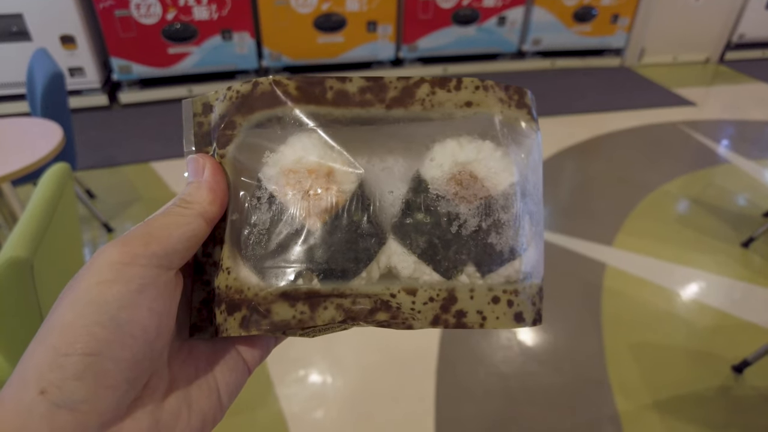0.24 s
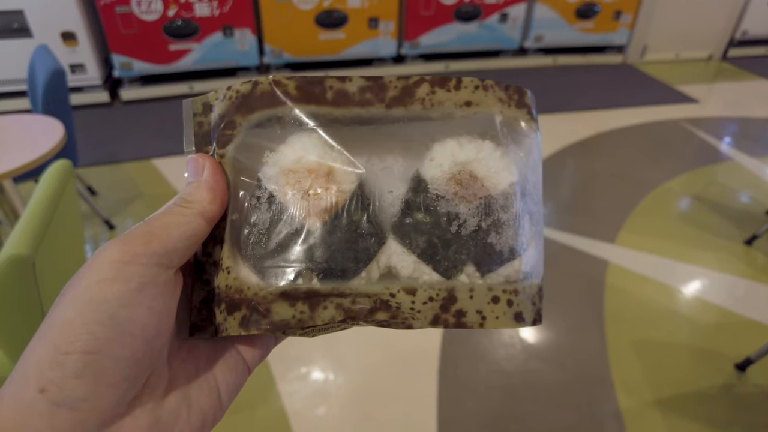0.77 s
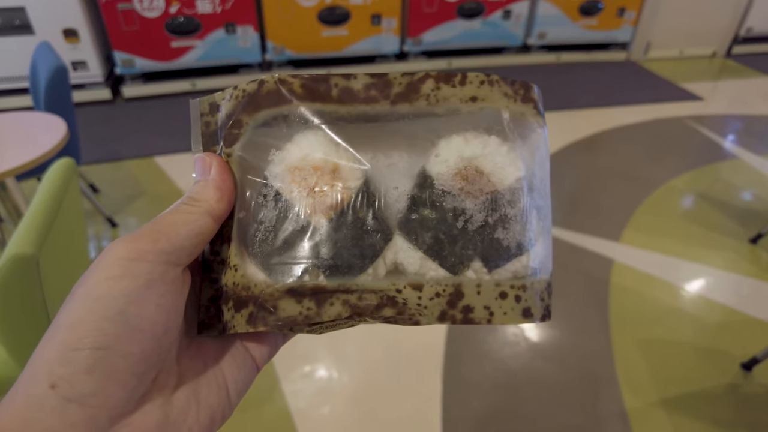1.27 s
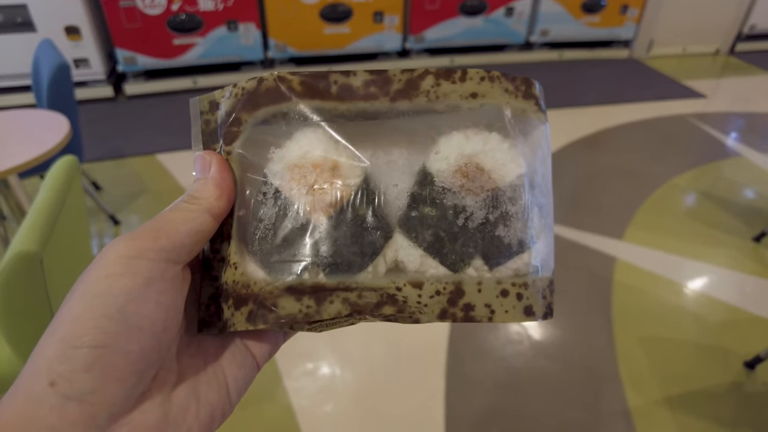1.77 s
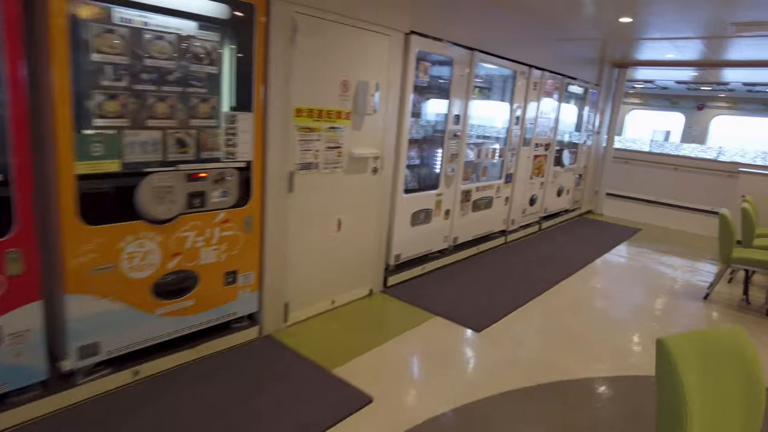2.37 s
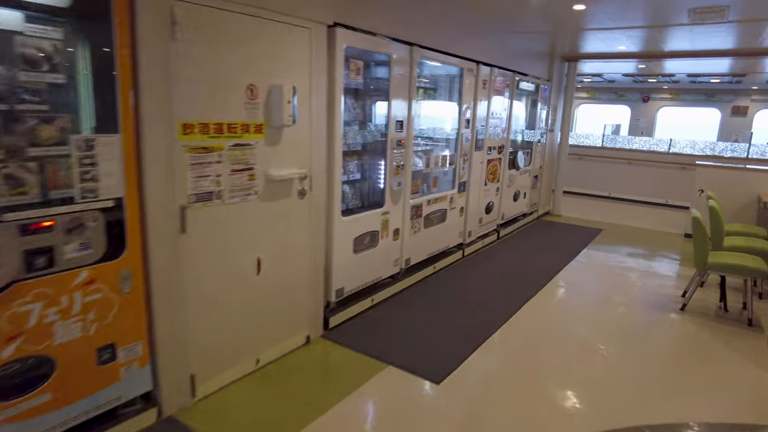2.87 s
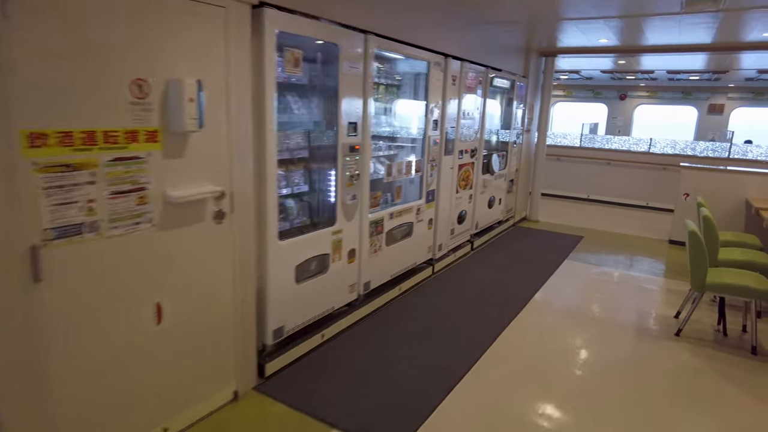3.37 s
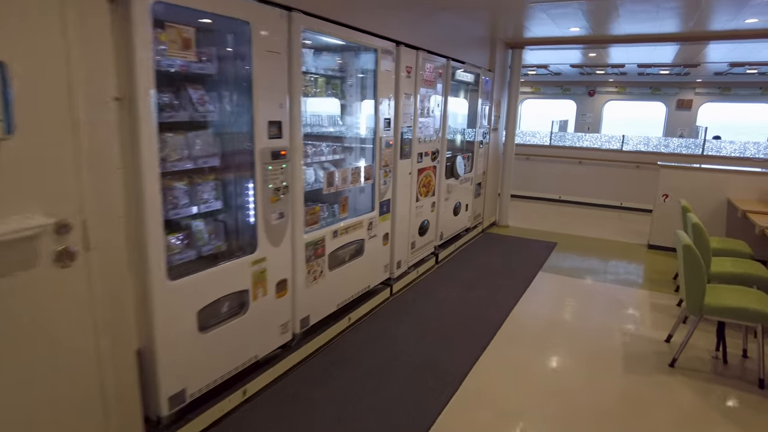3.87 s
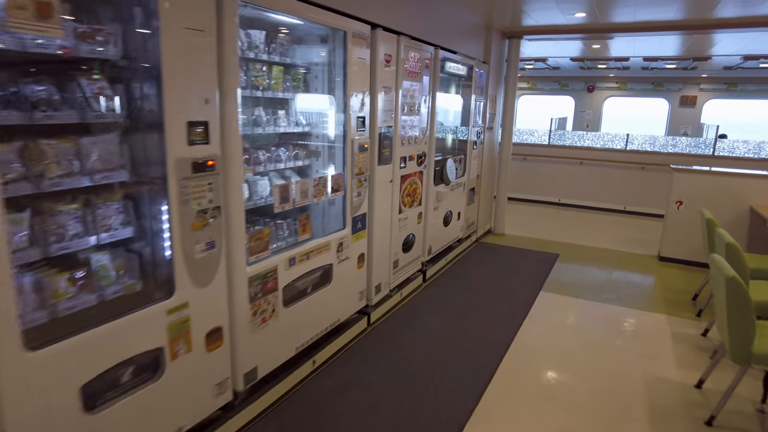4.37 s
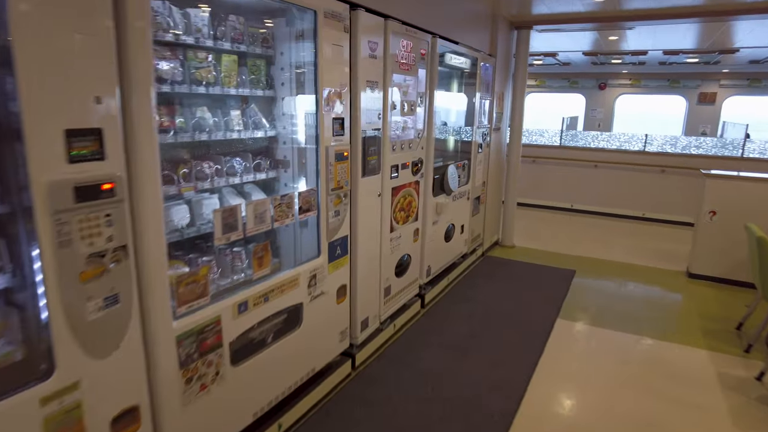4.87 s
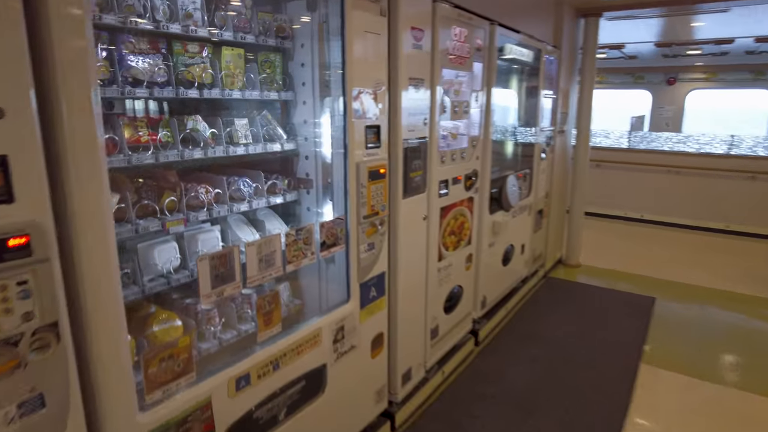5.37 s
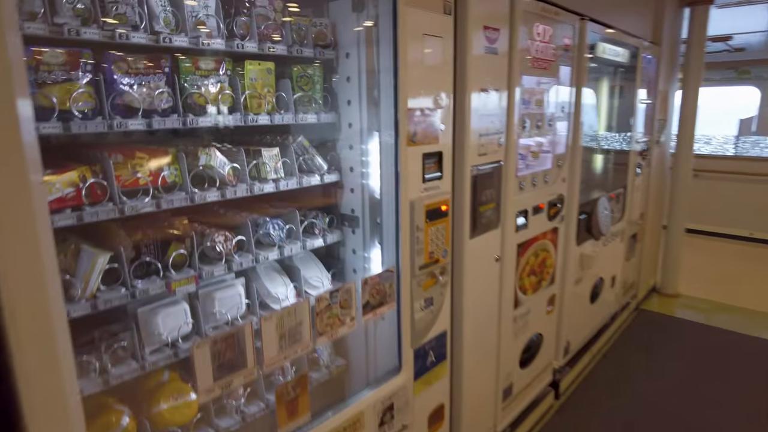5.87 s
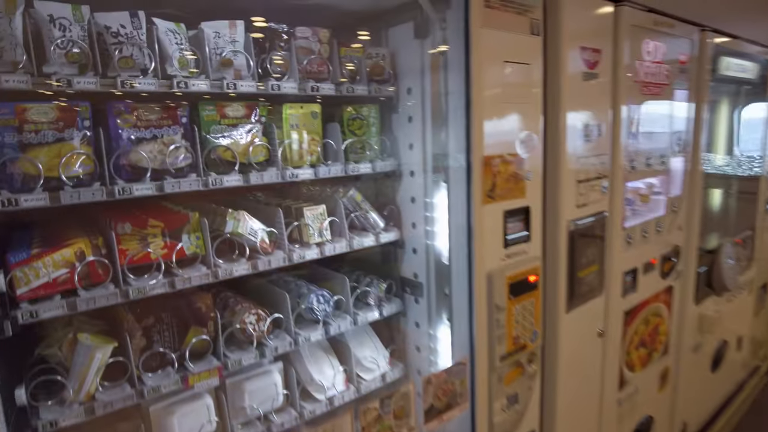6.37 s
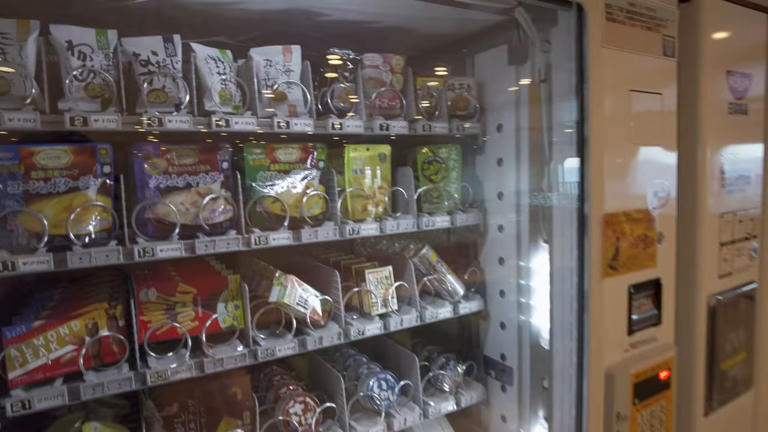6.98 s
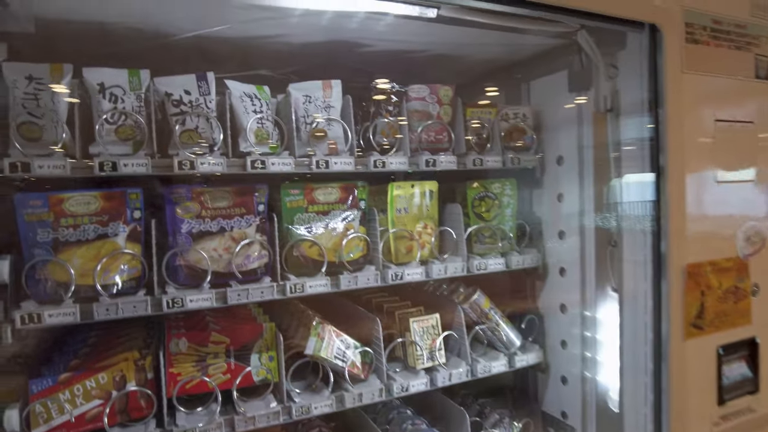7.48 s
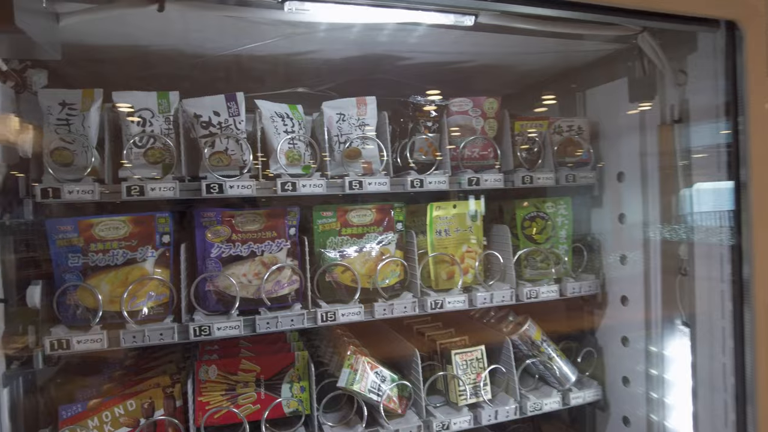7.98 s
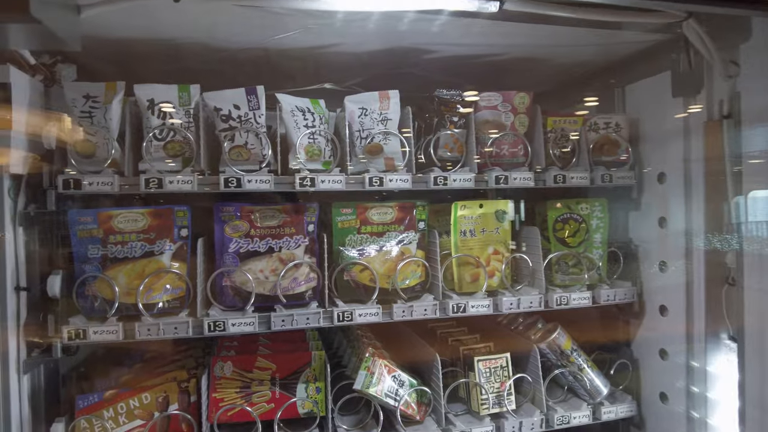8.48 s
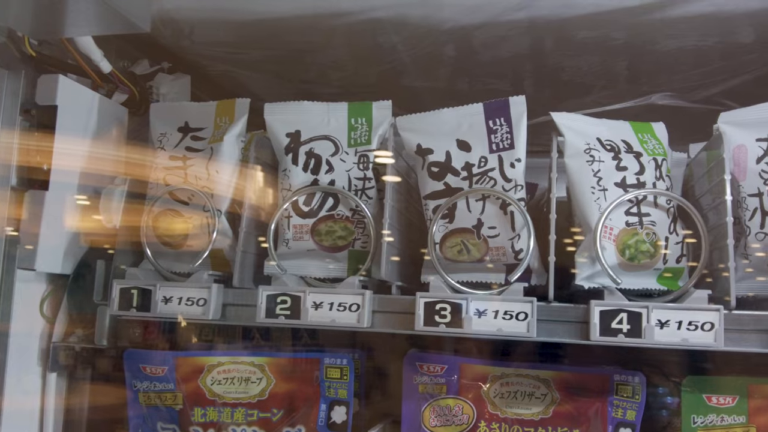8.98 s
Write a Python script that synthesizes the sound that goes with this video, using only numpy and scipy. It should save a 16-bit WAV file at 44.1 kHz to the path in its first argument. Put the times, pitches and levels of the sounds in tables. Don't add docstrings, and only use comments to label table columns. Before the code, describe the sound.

Handheld stereo capture in a ship's snack lounge: heavy low hull shudder, overloaded and pumping, over duct rumble, vent roar, hiss and faint compressor hum. First come crisp packet ticks and stronger rattling buzzes at a table. A hard change starts the walk, with dull deck thuds, small machine tones and a tiny shoe squeak while the throb changes colour. A final jump lands beside a machine, still throbbing.

```python
import sys
import numpy as np
from scipy import signal
from scipy.fft import rfft, irfft, next_fast_len
from scipy.io import wavfile
from scipy.ndimage import uniform_filter1d, minimum_filter1d

SR = 44100
rng = np.random.default_rng(int(sys.argv[2]) if len(sys.argv) > 2 else 0)


def undo_db(level):
    steps = np.asarray(level, float) / 20
    return 10 ** steps


def store_pcm(level_fs):
    pcm = np.round(np.clip(level_fs, -1, 1) * 32767).astype(np.int16)
    wavfile.write(sys.argv[1], SR, np.atleast_2d(pcm).T)


N = 407484
TOP_HZ = 15800

# start in seconds, hull pressure left at its end, pressure at its start.
SHOTS = [
    (0, -.09, .43),
    (2.39465, -.655, -.04),
    (8.76767, -.3, .3),
]
# level in dB, left then right.
HULL_LEAN_DB = [
    [-1.9],
    [1.5],
]
# multiple of the shaft speed, level in dB at the table, in dB where the
# walk starts, in dB where it ends, in dB at the glass.
STRONG = [(6, -15, -20, -12.5, -12), (9, -14, -22, -8.5, -8), (12, -13.5, -17.5, -24, -26),
          (15, -21.5, -16.5, -23, -32)]
# time in seconds, share of the way 0-1.
WALKED = [(2.4, 0.2), (3.4, 0.28), (4.4, 0.51), (5.9, 0.97), (8.76, 0.99)]


def hull():
    # multiple of the shaft speed, level in dB at the table, in dB early in
    # the walk, in dB late in it.
    weak_orders = [(3, -39, -45, -36), (4, -35, -34, -35), (5, -29, -27, -28), (7, -25, -23, -30),
                   (8, -22, -26, -29), (10, -23, -27, -25), (11, -22, -30, -31), (13, -21, -22, -36),
                   (14, -36, -25, -32), (16, -23, -23, -22), (17, -26, -21, -26), (18, -27, -30, -29),
                   (19, -33, -34, -43), (20, -27, -25, -36), (21, -34, -30, -33), (22, -37, -28, -41),
                   (23, -33, -41, -35), (24, -28, -43, -35), (25, -36, -37, -43), (26, -33, -42, -37)]
    still_s = [.91, 2.02, 2.81, 4.47, 4.88, 5.75, 6.18, 7.18, 8.68, 8.93]
    shaft_hz = 1.997
    starts = shot_starts()
    seated = np.arange(N) < starts[1]
    glass_db = -3.5 * (np.arange(N) >= starts[2])
    walked = in_time(WALKED)[0]
    duck_db = -0.95 * lulls()

    orders = [round(row[0]) for row in STRONG + weak_orders]
    levels = [undo_db(db + 3.0 + duck_db) for db in strong_orders()]
    for k, table_db, early_db, late_db in weak_orders:
        walk_db = early_db + (late_db - early_db) * walked
        place_db = np.where(seated, table_db, walk_db) + glass_db
        levels.append(undo_db(place_db + 5.5 + duck_db + 2.0 * drift(0.77)))

    out = np.zeros(N)
    turn = 2 * np.pi * shaft_hz / SR
    for (s, end, begin), a, b in zip(SHOTS, starts, starts[1:]):
        trials = rng.uniform(0, 2 * np.pi, (len(orders), 12000))
        spin = np.exp(1j * trials)

        def pressure(i):
            now = np.array([g[i] * np.exp(1j * k * turn * i) for k, g in zip(orders, levels)])
            return (now @ spin).imag

        still = [abs(pressure(round((q + d) * SR)))
                 for q in still_s for d in (-.02, -.007, .007, .02) if a < q * SR < b]
        peak = np.max([abs(pressure(i)) for i in np.linspace(a, b - 1, 150).astype(int)], axis=0)
        misfit = abs(pressure(b - 1) - end) + abs(pressure(a) - begin)
        misfit += .2 * pressure(a + 300) - .3 * pressure(b - 300) * (end < -.5)
        misfit += np.mean(still, axis=0) + 2 * peak
        angles = trials[:, np.argmin(misfit)]
        i = np.arange(a, b)
        out[i] = sum(g[i] * np.sin(k * turn * i + p) for k, g, p in zip(orders, levels, angles))
    return out * undo_db(HULL_LEAN_DB)


def strong_orders():
    # multiple of the shaft speed, time in seconds,
    # gain in dB, half width in seconds.
    loud_spots = [
        (12, 5.0, 7, 1.2),
        (15, 3.9, 4, .6),
        (15, 8.1, 7, .6),
    ]
    t = (np.arange(N) + .5) / SR
    walked = in_time(WALKED)[0]
    out = []
    for k, table_db, start_db, end_db, glass_db in STRONG:
        walk_db = start_db + (end_db - start_db) * walked
        for multiple, s, db, width in loud_spots:
            if round(multiple) == round(k):
                walk_db = walk_db + db * np.exp(-((t - s) / width) ** 2)
        later_db = np.where(t < SHOTS[2][0], walk_db, glass_db)
        out.append(np.where(t < SHOTS[1][0], table_db, later_db))
    return out


def lulls():
    # time in seconds, gain in dB, length in seconds.
    main_lulls = [(0.153, 3, 0.57), (0.48, 2, 0.19), (0.616, 4, 0.2), (0.77, 4, 0.12), (1.13, 4, 0.35),
                  (1.385, 1, 0.13), (1.638, 4, 0.24), (1.94, 2.5, 0.075), (2.124, 3, 0.2),
                  (2.274, 2.5, 0.21), (2.71, 3, 0.35), (3.01, 1.5, 0.25), (3.388, 1.5, 0.59),
                  (3.712, 2.5, 0.36), (3.974, 2.5, 0.065), (4.27, 0.5, 0.24), (4.44, 3, 0.26),
                  (4.87, 2.5, 0.15), (4.99, 2, 0.17), (5.362, 2.5, 0.14), (5.543, 3, 0.23),
                  (5.703, 2, 0.12), (5.873, 2, 0.23), (6.23, 2, 0.16), (6.475, 1.5, 0.11),
                  (6.678, 3.5, 0.26), (6.858, 4.5, 0.13), (7.26, 1.5, 0.34), (7.478, 2, 0.29),
                  (7.69, 2.5, 0.25), (8.033, 2, 0.12), (8.19, 5, 0.13), (1.015, -1, 0.095),
                  (.85, -1.5, .06), (4.534, -2, 0.057), (4.314, 1.5, 0.05), (4.034, -2, 0.052),
                  (8.316, -0.5, .16)]
    # time in seconds, gain in dB, length in seconds.
    last_lulls = [(8.55, 1.2, 0.23), (8.69, 4.1, 0.068), (8.95, 3.55, 0.21), (9.12, 1.9, 0.27)]
    rise, lead = 0.49, 0.39
    t = np.arange(N) / SR
    return sum(np.interp(t - s + lead * length, [0, rise * length, length], [0, db, 0])
               for s, db, length in main_lulls + last_lulls)


def limiter_db(x):
    ceiling = .79
    need_db = np.minimum(0, 20 * np.log10(ceiling / (abs(x).max(axis=0) + 1e-9)))
    ramp = 110 * np.arange(N) / SR
    held_db = np.minimum.accumulate(minimum_filter1d(need_db, size=441) - ramp) + ramp
    return uniform_filter1d(np.minimum(held_db, 0), size=441)


def butted(x):
    out, starts, lean = x.copy(), shot_starts(), undo_db(HULL_LEAN_DB)
    for (s, end, begin), a, b in zip(SHOTS, starts, starts[1:]):
        i = np.arange(a, b)
        out[:, i] += (begin * lean - x[:, [a]]) * np.exp((a - i) / 700)
        out[:, i] += (end * lean - x[:, [b - 1]]) * np.exp((i - b) / 700)
    return out


def buzzes():
    # start in seconds, peak level in dB, time to fall 60 dB in seconds,
    # left over right in dB.
    rattles = [(0.0982, -48.5, 0.75, 2), (0.632, -37.5, 0.3, 2.5), (1.124, -37, 0.37, 1.5),
               (1.627, -37, 0.29, 3), (2.1266, -41, 0.2, 2), (2.8094, -52, 0.88, 1.5),
               (3.7494, -53, 0.44, 8), (3.8693, -52, 0.7, -1), (4.2094, -51.5, 0.32, 1),
               (4.2971, -47.5, 0.54, 2), (4.4394, -51.5, 0.7, 2), (4.9932, -47, 0.24, 2),
               (5.4694, -57, 0.31, 10.5), (5.7069, -49, 0.099, -9), (6.1669, -49, 0.7, 1.5),
               (6.6793, -50.5, 0.37, -1), (6.8563, -41, 0.25, 0.5), (7.1656, -53, 0.36, -7),
               (7.2734, -45.5, 0.4, 2), (7.519, -43.5, 0.31, 2), (8.0278, -47, 0.5, -1.5),
               (8.1994, -55, 0.09, -5.5), (8.5205, -47.5, 0.33, 3.5), (8.9294, -48, 0.27, -2)]
    # frequency in Hz, level in dB per Hz.
    edge_colour = [(6000, -28), (7500, -5.5), (9200, -3), (10000, -5.5), (12300, -9), (14100, -8),
                   (15800, -7)]
    # frequency in Hz, level in dB per Hz.
    body_colour = [(600, -37), (1500, -11), (3500, -0.5), (6000, -7.5), (8000, -15), (10000, -32.5)]
    t, edge, body = np.arange(N) / SR, np.zeros((2, N)), np.zeros((2, N))
    for s, peak_db, t60, pan_db in rattles:
        at = slice(round(s * SR), round((s + 0.72) * SR))
        age = t[at] - t[at][0]
        fall_db = -60 * age / np.clip(t60, .1, .7)
        fall = undo_db(peak_db - 10.5 + fall_db + pan_db * np.array([[.5], [-.5]]))
        edge[:, at] += fall * (1 - np.exp(-age / 0.003))
        body[:, at] += fall * undo_db(8) * (1 - np.exp(-age / 0.01))
    flutter = undo_db(1.6 * drift(60))
    return (edge * broad(edge_colour) + body * broad(body_colour)) * flutter


def ticks():
    # start in seconds, level in dB, low edge in Hz, high edge in Hz,
    # decay in seconds.
    snaps = [
        (.1862, -30, 3000, 5600, .0012),
        (.1863, -29, 6000, 9200, .001),
        (.1865, -39, 9500, 15500, .001),
        (.187, -29, 1500, 2400, .002),
        (.1872, -35, 700, 1400, .002),
        (.1947, -32, 3000, 8500, .0009),
        (.1949, -45, 9500, 15500, .0012),
        (.4894, -49, 7500, 13000, .003),
        (.7698, -35, 6000, 8100, .0018),
        (.7705, -36, 2000, 3200, .0012),
    ]
    out, age = np.zeros(N), np.arange(400) / SR
    for s, db, low_hz, high_hz, decay in snaps:
        crackle = rng.standard_normal(400)
        band = signal.butter(3, [low_hz, high_hz], "band", fs=SR, output="sos")
        snap = signal.sosfilt(band, crackle * np.exp(-age / decay) * (1 - np.exp(-age / 0.00023)))
        start = round(s * SR)
        out[start:start + 400] += snap / abs(snap).max() * undo_db(db)
    return out


def footfalls():
    # start in seconds, level in dB, pitch in Hz,
    # time to fall 60 dB in seconds.
    steps = [(2.04, -22, 64, 0.46), (2.62, -16, 59, 0.44), (6.04, -20, 55, .4), (6.79, -24, 100, 0.34),
             (7.4, -26, 55, 0.33), (8.2, -32.5, 95, .25), (9.04, -28, 59.5, .25)]
    out, age = np.zeros(N + SR), np.arange(SR // 2) / SR
    for s, db, hz, t60 in steps:
        swell = undo_db(db - 60 * age / t60) * (1 - np.exp(-age / .015))
        start = round(s * SR)
        out[start:start + SR // 2] += swell * np.sin(2 * np.pi * hz * age * (1 - 0.59 * age))
    return out[:N]


def squeaks():
    # start in seconds, end in seconds, pitch in Hz, width in Hz, level in dB.
    machine_tones = [(0, 2.39, 5410, 45, -72), (2.95, 3.55, 7800, 150, -81), (2.962, 2.99, 2560, 120, -54),
                     (2.988, 3.012, 2580, 120, -51.5), (6.172, 6.206, 4450, 400, -54),
                     (2.4, 4.0, 177, 3, -45), (2.56, 2.68, 572, 12, -52), (2.36, 2.41, 585, 40, -51),
                     (2.21, 2.31, 910, 40, -53), (8.35, 8.62, 228, 4, -45), (5.85, 6.8, 243, 3, -46.5),
                     (5.2, 8.76, 227, 4, -51), (0, 2.39, 238, 14, -49), (7.35, 7.85, 238, 3, -47),
                     (5.2, 5.5, 234, 4, -47), (2.55, 2.95, 236, 6, -48), (6.85, 6.876, 1330, 90, -47),
                     (6.868, 6.892, 1560, 90, -48), (4.148, 4.172, 3440, 90, -58),
                     (4.128, 4.148, 2980, 120, -56), (4.05, 4.08, 2980, 120, -58),
                     (2.99, 3.02, 3020, 90, -57)]
    # start in seconds, length in seconds, first pitch in Hz, last pitch in Hz, level in dB.
    sole_squeak = (4.293, .037, 10800, 10150, -62)
    t = np.arange(N) / SR

    def gate(start, end):
        return np.clip(np.minimum(t - start, end - t) / .008, 0, 1)

    out = np.zeros(N)
    for start, end, hz, width, db in machine_tones:
        out += gate(start, end) * undo_db(db) * whistle(hz, width)
    s, length, from_hz, to_hz, db = sole_squeak
    hz = from_hz + (to_hz - from_hz) * np.clip((t - s) / length, 0, 1) ** 2
    return out + undo_db(db) * gate(s, s + length) * np.sin(2 * np.pi * np.cumsum(hz) / SR)


def whistle(hz, width):
    r = np.exp(-np.pi * width / SR)
    ring = [1, 0, -1, 1, -2 * r * np.cos(2 * np.pi * hz / SR), r * r]
    return rms_one(signal.sosfilt([ring, ring], rng.standard_normal(N)))


def room():
    # frequency in Hz, level in dB per Hz.
    rumble_colour = [(26, -27), (45, 1), (49, -9), (65, -8.5), (140, -24), (167, -24), (201, -25.5),
                     (233, -24.5), (326, -30.5), (571, -36), (1100, -43.5), (1430, -74), (2420, -120)]
    # frequency in Hz, level in dB per Hz.
    vent_colour = [(530, -29.5), (900, -8), (1040, -14), (1160, -6), (1270, 1), (2070, -4.5), (2350, -8.5),
                   (3050, -7.5), (3520, -15), (4360, -17), (5000, -26.5), (6500, -44.5), (11000, -120)]
    # frequency in Hz, level in dB per Hz.
    hiss_colour = [(2350, -31), (4000, -3.5), (5690, -4.5), (8620, -15.5), (11700, -18), (12800, -18),
                   (15900, -27.5)]
    # pitch in Hz, width in Hz, level in dB.
    hum_tones = [(59.8, 2.3, -32), (83, 15, -39.5), (114.4, 2.3, -45.5), (148.6, 22, -46),
                 (177.6, 7.4, -53), (262.6, 6.7, -60.5), (291.6, 5.3, -56.5), (357.4, 4.8, -58),
                 (386.3, 6.7, -63.5), (568, 19, -60.5), (676, 9.4, -65.5), (787, 32, -64.5),
                 (922, 30, -67.5), (1230, 48, -63.5)]
    # pitch in Hz, width in Hz, level in dB.
    whine_tones = [(7760, 400, -82.5), (10800, 550, -85), (12900, 670, -80), (14800, 1200, -86)]
    # start in seconds, then rumble, hiss and whine in dB over their usual level.
    places = [
        (0, 1.3, 3.5, -6),
        (2.39, 0.54, 2.5, 3.5),
        (4.02, -0.25, 1.45, 2),
        (8.77, 0.5, 2.4, 0),
    ]
    rumble_db, hiss_db, whine_db = by_place(places)
    age = np.arange(N) / SR - 2.2
    whine_db = whine_db + 7 * (age > 0) * np.clip(1 - (age / 1.8) ** 2, 0, 1)
    air_db = pumping()
    pump_db = air_db + 53
    rumble = undo_db(-30 + rumble_db + 0.79 * pump_db) * broad(rumble_colour)
    vent = undo_db(air_db + 3.0) * broad(vent_colour)
    hiss = undo_db(-63.5 + hiss_db + .85 * pump_db + 1.5 * drift(9.9)) * broad(hiss_colour)
    whines = undo_db(whine_db - 1.5 + pump_db + 1.5 * drift(20)) * tones(whine_tones)
    hums = undo_db(0.22 * pump_db) * tones(hum_tones)
    return rumble + vent + hiss + whines + hums


def pumping():
    # time in seconds, level in dB.
    held_air = [(0, -54.5), (0.1, -51), (2.3, -49), (2.5, -50.5), (3.6, -49.5), (4.4, -50.5), (4.7, -51),
                (6.0, -50.5), (7.3, -50), (7.9, -52), (8.3, -54.5), (8.8, -50.5), (9.15, -51.5),
                (9.24, -58.5)]
    return in_time(held_air)[0] + 1.33 * lulls()


def broad(spectrum):
    low_hz, high_hz = spectrum[0][0], spectrum[-1][0]
    return coloured(lambda hz: undo_db(at_hz(spectrum, hz)) * (hz > low_hz) * (hz < high_hz))


def tones(table):
    def peaks(hz):
        return sum(undo_db(db) / np.sqrt(w) / (1 + (2 * (hz - f) / w) ** 2) for f, w, db in table)
    return coloured(peaks) * np.sqrt(sum(undo_db(db) ** 2 for f, w, db in table))


def coloured(gain_at):
    # frequency in Hz, side over middle in dB.
    side_db = [(60, -20.5), (110, -19.5), (200, -11), (380, -8.5), (700, 2.5), (1290, -5), (2380, -3.5),
               (4400, 1), (8120, 0), (15000, -1.5)]
    # frequency in Hz, left over right in dB.
    lean_db = [(60, -2), (110, 0.5), (200, -0.5), (380, 1), (700, 2.5), (1290, 1), (2380, -1), (4400, 0.0),
               (8120, 1), (15000, 1)]
    size = next_fast_len(N)
    hz = np.maximum(np.arange(size // 2 + 1) * SR / size, 1)
    mid, side = rfft(rng.standard_normal((2, size)))
    side = side * undo_db(at_hz(side_db, hz))
    lean = undo_db(at_hz(lean_db, hz) / 2)
    pair = np.array([(mid + side) * lean, (mid - side) / lean])
    return rms_one(irfft(pair * gain_at(hz) * (hz < TOP_HZ), size)[:, :N])


def drift(rate):
    r = np.exp(-200 * np.pi * rate / SR)
    noise = rng.standard_normal(N // 100 + 2002)
    slow = signal.lfilter([1], [1, -2 * r, r * r], noise)[2000:]
    return np.interp(np.arange(N) / 100, np.arange(len(slow)), rms_one(slow))


def rms_one(x):
    return x / np.sqrt(np.mean(x ** 2) + 1e-20)


def in_time(rows):
    s, *columns = np.transpose(rows)
    return [np.interp(np.arange(N) / SR, s, c) for c in columns]


def by_place(rows):
    starts = [row[0] * SR for row in rows]
    here = np.searchsorted(starts, np.arange(N), "right") - 1
    return np.array(rows)[here, 1:].T


def at_hz(points, hz):
    f, db = np.transpose(points)
    return np.interp(np.log(hz), np.log(f), db)


def shot_starts():
    return [round(row[0] * SR) for row in SHOTS] + [N]


def scene():
    shaking = hull()
    gain_db = limiter_db(shaking)
    air = buzzes() + ticks() + footfalls() + squeaks() + room()
    return butted(shaking * undo_db(gain_db) + air * undo_db(0.69 * gain_db - 1.36))


def band_limit(x):
    return signal.sosfilt(signal.butter(12, 16820, fs=SR, output="sos"), x)


def record(dry):
    top_cut = signal.cheby2(10, 25, TOP_HZ + 1200, fs=SR, output="sos")
    held = signal.sosfiltfilt(top_cut, dry * undo_db(limiter_db(dry)))
    top = signal.sosfiltfilt(signal.butter(10, 13500, "high", fs=SR, output="sos"), held)
    power = uniform_filter1d(np.sum(top ** 2, axis=0), size=1500) * undo_db(1.6 * drift(15))
    faint = 1. * (power < np.quantile(power, .05))
    mix = held - uniform_filter1d(faint, size=300) * top
    return band_limit(mix)


dry = scene()
out = record(dry)
store_pcm(out)
```